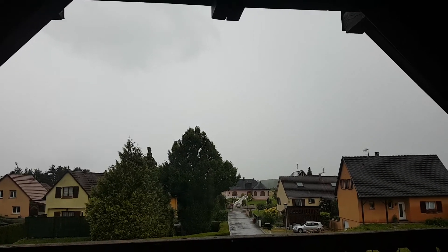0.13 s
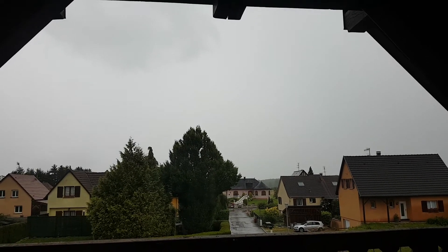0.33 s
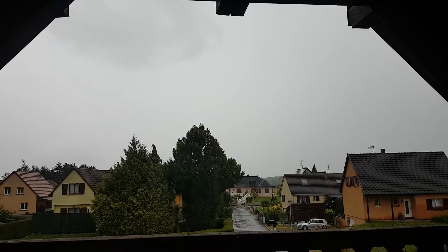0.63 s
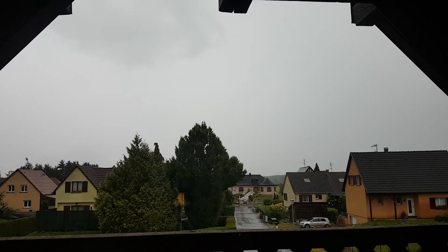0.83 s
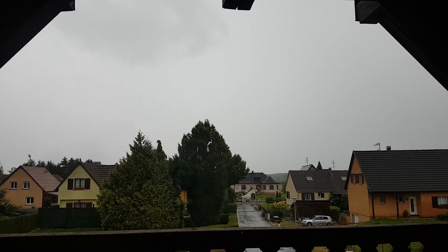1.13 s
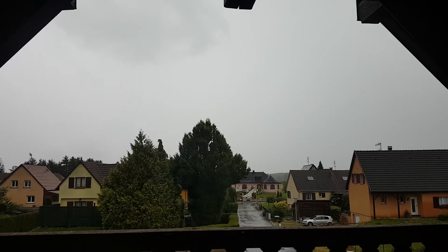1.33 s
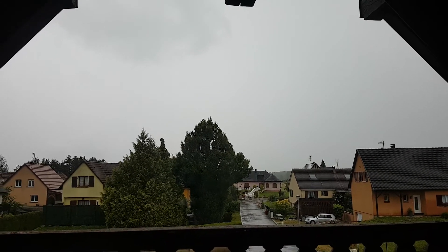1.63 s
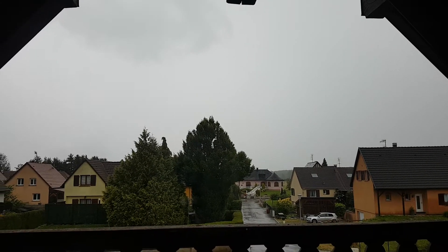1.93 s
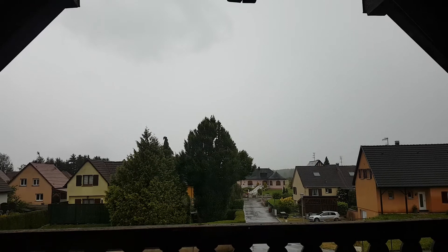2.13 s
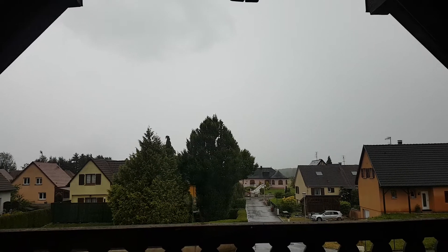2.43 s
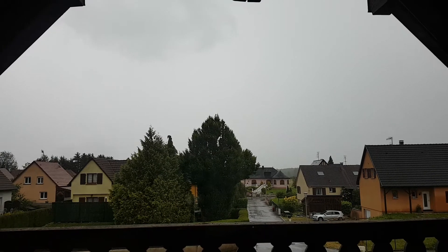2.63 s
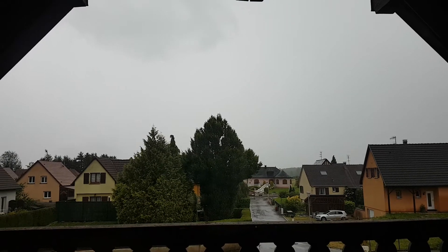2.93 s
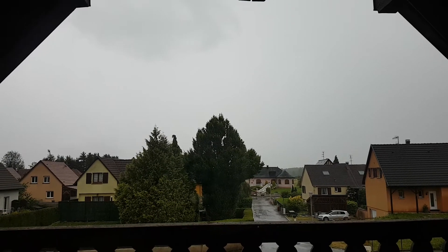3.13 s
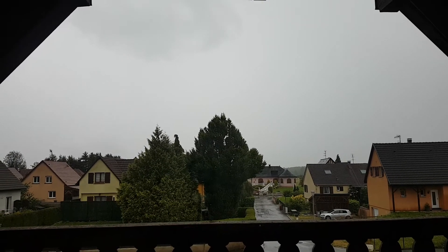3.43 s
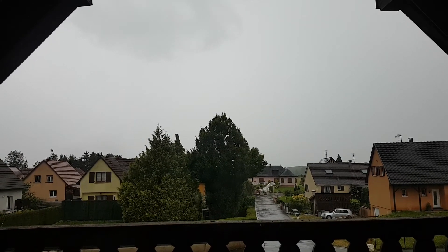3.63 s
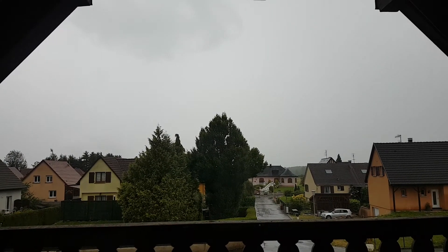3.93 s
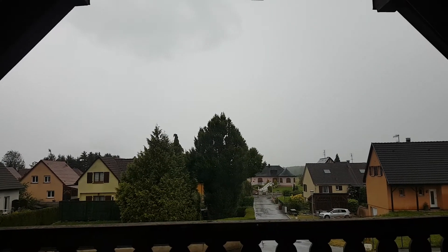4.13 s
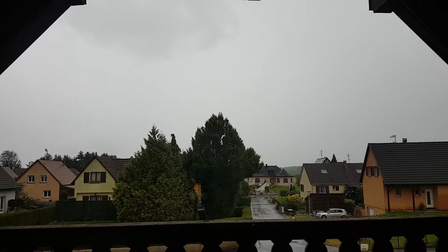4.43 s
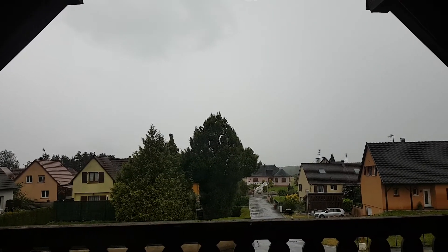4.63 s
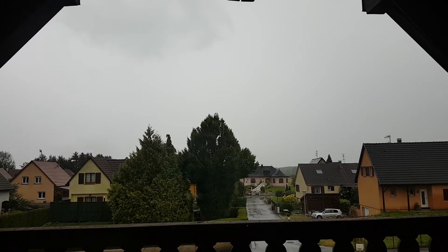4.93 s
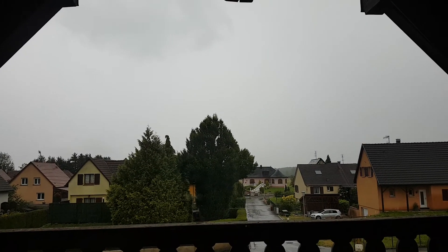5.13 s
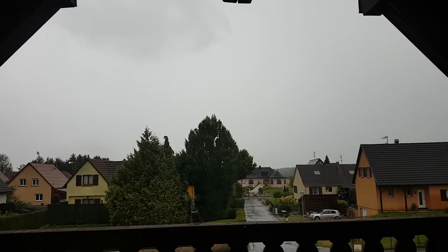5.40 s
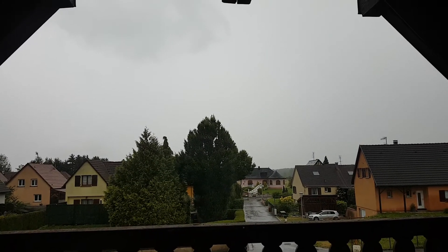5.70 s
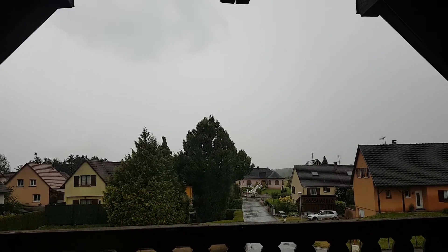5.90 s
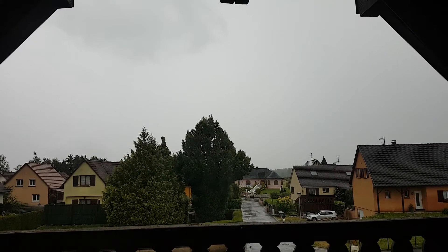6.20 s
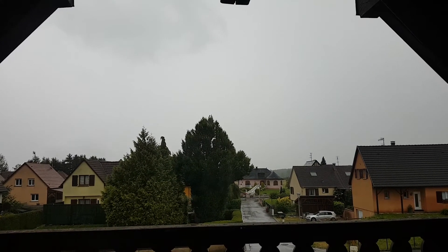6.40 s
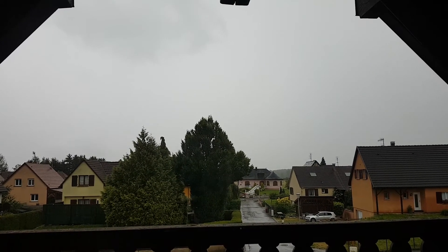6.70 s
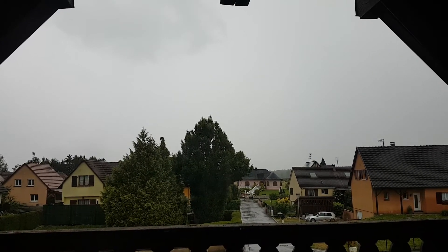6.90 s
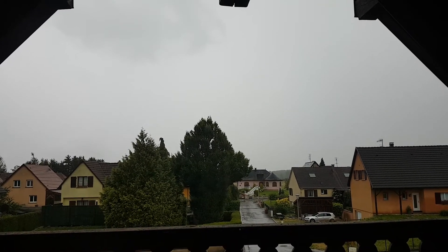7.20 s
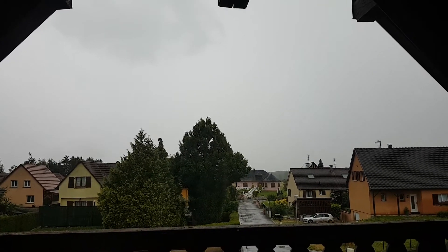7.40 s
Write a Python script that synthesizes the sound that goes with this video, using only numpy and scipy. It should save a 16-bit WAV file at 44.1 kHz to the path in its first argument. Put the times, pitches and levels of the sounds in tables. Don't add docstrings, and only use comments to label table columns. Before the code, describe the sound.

Near-silent drizzle, one ringing drop on the sill, then a violent rolling thunderclap crackles, booms repeatedly and dies into a low rumble.

```python
import sys
import numpy as np
from scipy import signal
from scipy.fft import rfft, irfft
from scipy.io import wavfile
from scipy.ndimage import uniform_filter1d

SR = 44100
rng = np.random.default_rng(int(sys.argv[2]) if len(sys.argv) > 2 else 0)


def invert_db(level):
    return 10 ** (np.asarray(level, dtype=float) / 20)


def output_pcm(signal):
    pcm = np.clip(np.atleast_2d(signal).T, -1, 1) * 32767
    wavfile.write(sys.argv[1], SR, np.round(pcm).astype(np.int16))


N = 332999

# frequency in Hz, level in dB per Hz.
RAIN_COLOUR = [(15, -26), (25, 0), (48, -13), (216, -12), (275, -20), (351, -12.5), (767, -20.5),
               (854, -14), (977, -14), (2080, -20.5), (2950, -24.5), (7180, -35), (9160, -42.5),
               (13400, -36.5), (15700, -35.5)]
# time in seconds, level in dB.
RAIN_SWELL = [(0, -62), (.8, -60.5), (1.599, -58), (3, -60.5), (4.999, -59), (6.499, -59), (7.55, -59.5)]
# start in seconds, peak in dB, treble in dB, ring in dB, ring pitch in Hz.
SILL_DROPS = [
    (.3374, -59, 19.5, -6, 4900),
    (.5274, -68, 7, -4, 4900),
    (1.0793, -29, -6.5, 14, 5020),
    (3.7667, -37, -4, 12, 3450),
]
# frequency in Hz, level in dB per Hz.
SILL_COLOUR = [(900, -41), (2200, -8.5), (3500, -6), (4000, -3), (4830, -8.5), (6000, -8.5), (7400, -12),
               (9200, -22.5), (11000, -7), (15000, -13)]
# frequency in Hz, likeness from 0 to 1.
ALIKE = [(30, .98), (120, .95), (450, .93), (560, .42), (850, .36), (1100, .52), (1500, .46), (2000, .3),
         (3500, .25), (6000, .03)]
# frequency in Hz, lead in radians.
LEAD = [(0, 0), (100, -.45), (500, -.55), (600, -.8), (750, -1.5), (950, -3), (1400, -3.2), (1800, -4.2),
        (2200, -6), (4000, -12)]
# frequency in Hz, left minus right in dB.
LEAN = [(60, 1), (130, -0.5), (290, -2.5), (640, -3), (1410, 0.5), (3100, -2), (6820, -2.5), (15000, -0.5)]
# frequency in Hz, level in dB per Hz.
AIR_COLOUR = [(12, -68), (20, -23), (53, 2.5), (113, -4.5), (146, -0.5), (260, -6), (400, -5), (702, -11),
              (1000, -14), (1400, -18.5), (2000, -31.5), (2500, -50.5), (3500, -62.5), (6000, -120)]
# frequency in Hz, width in
# Hz, gain in dB.
PEAKS_AND_DIPS = [(51, 9, -6), (62, 5.2, 5.5), (97, 41, 12), (152, 18, 4), (214, 7.4, 5.5), (256.7, 15, 5.5),
                  (293.8, 27, -9), (362.3, 14, 4.5), (463, 8, 5), (516, 11, 5.5), (639, 30, 2.5),
                  (857, 73, 2.5), (950, 490, 3), (1560, 120, 3.5)]
# time in seconds, strength in dB, depth in dB, nearness in dB.
ROLL = [(0.0, -85, -12.0, 3.5), (0.62, -75, -4, 1.5), (0.95, -65, 6, 5.5), (1.55, -47.5, -3.3, 5.5),
        (1.85, -61.5, 10.5, 3.5), (2.03, -57, 2.5, 4), (2.3, -30, -3, 2.8), (2.5, -35.5, 6.5, 3),
        (2.95, -37.5, -7, 1.55), (3.3, -27.5, 5, -0.7), (3.55, -44.5, 9, 1.5), (4.048, -49, 5.5, -2),
        (4.5, -41.5, 14.5, -2.2), (5.3, -32, 10.5, -2.8), (5.95, -42.5, -16, 0.5), (6.4, -44, 6.1, 1.5),
        (6.9, -52.5, 6.5, 4), (7.55, -55.5, 7.5, 3)]
PIECE_BORDERS = [110, 290, 850, 1800]
# level in dB, share of depth, share of nearness.
PIECES = [
    (-15.5, 1.45, 1.5),
    (-8, 1.15, 0.5),
    (-2.5, 0.042, -0.5),
    (-15.5, -0.22, 2.55),
    (-23, -.16, 3.5),
]
# peak time in seconds, peak in dB,
# fade in seconds per 10 dB, depth in dB.
SURGES = [(0.832, -53.5, 0.15, -4), (0.987, -46.5, 0.225, -7), (1.771, -39.5, 0.37, -9),
          (2.134, -24, 0.0782, 3.5), (2.259, -27, 0.12, -1), (2.374, -25.5, 0.067, 3.7),
          (2.558, -25, 0.04, 3.5), (2.802, -18.5, 0.0682, 8.5), (2.841, -20.6, 0.0176, 9.5),
          (2.901, -23.5, 0.0729, 4), (3.137, -23.5, 0.05, 9.5), (3.407, -38, 0.1047, 1.5),
          (3.774, -32.5, 0.26, -2), (4.204, -28.5, 0.03, 6.5), (4.269, -26.5, 0.172, 10),
          (5.49, -34.5, 0.13, 11.5), (5.807, -31.5, 0.0867, 11), (5.886, -33, 0.09, 9.5),
          (6.06, -32.5, 0.16, 8.5), (6.321, -38, 0.16, 7.5), (6.798, -46, 0.22, 9), (7.328, -49, -1.4, 5.5)]
# peak time in seconds, peak in dB,
# fade in seconds per 10 dB, depth in dB.
BURSTS = [(1.087, -54, 0.5, -9), (1.81, -35.5, 0.34, -10), (1.955, -37, 0.2, -5.5), (2.066, -23, 0.05, -5),
          (2.599, -18, 0.08, 7.5), (2.68, -31, 0.13, 5), (2.771, -23.5, 0.12, -15.5),
          (2.978, -27.5, 0.065, 8), (3.1, -28, 0.04, 8), (3.351, -24.5, 0.053, 7.5),
          (3.912, -30, 0.13, 5.5), (4.397, -28.5, 0.22, 4.5), (4.546, -32.5, 0.38, -0.8),
          (4.769, -26, 0.34, -1.8), (4.981, -32.5, 0.068, 14), (5.073, -31.5, 0.13, 11),
          (5.269, -35, 0.25, 12.5), (5.365, -28, 0.126, -18.5), (5.542, -28.5, 0.1175, 9),
          (5.641, -26.5, 0.0945, 10.5), (6.144, -31, 0.0474, 16.5), (6.43, -46, 0.28, -1.5),
          (6.7, -46, 0.12, 4.5)]
# start in seconds, peak in dB, ring pitch in Hz.
CLAPS = [(.812, -48.5, 451), (.9, -36, 393), (1.65, -35, 410), (1.753, -19, 413), (1.848, -20, 361),
         (1.946, -15.5, 472), (2.043, -13.5, 400), (2.068, -8, 451), (2.359, -11, 368), (2.547, -16, 326),
         (2.596, -6.5, 463), (2.674, -12.5, 219.5), (2.79, -8, 153), (2.839, -6.5, 216.6),
         (2.887, -12.5, 336), (3.102, -19.5, 141.6), (3.139, -10, 338), (3.282, -20.5, 313),
         (3.401, -18, 346), (4.18, -19.5, 149), (4.259, -7.5, 278), (4.755, -16, 353), (4.969, -21, 201),
         (5.065, -16.5, 140), (5.344, -18, 476), (5.466, -17, 131.4), (5.628, -11.5, 144.6),
         (5.662, -4.5, 251), (5.878, -25, 128.6), (6.141, -17, 152)]
# start in seconds, peak in dB, ring pitch in Hz.
BOOMS = [(1.08, -50.5, 70), (3.68, -37, 69.7), (4.74, -29.5, 70), (6.45, -43, 99.3), (7.001, -41.5, 100),
         (2.071, -35.5, 104), (2.594, -28.5, 90.4), (2.787, -22, 66.6), (2.869, -25, 71.2),
         (3.103, -23, 101.5), (3.913, -32, 91.6), (4.199, -27, 101.8), (5.041, -18.5, 66.2),
         (5.25, -18, 88.4), (6.031, -35.5, 57.8), (6.66, -38, 62), (6.759, -40, 62.6), (7.268, -45, 64.4)]
# start in seconds, peak in dB, centre in Hz,
# time to fade by 60 dB in seconds.
CRACKS = [(.72, -56, 1190, .4), (.82, -52, 1300, 0.35), (.926, -60.5, 2300, 0.044),
          (2.049, -55, 2600, 0.11), (2.0702, -58.5, 2800, 0.087), (2.124, -58.5, 2800, .12),
          (2.245, -64.5, 2600, .09), (2.5945, -43, 2180, 0.13), (2.5946, -58.5, 3240, 0.073),
          (.48, -57.5, 900, .1), (2.6197, -68, 3600, 0.053), (2.779, -54.5, 2200, 0.2),
          (2.3, -55, 2000, .2), (5.876, -61.5, 1990, .08), (5.659, -65, 2000, .09),
          (6.411, -65.5, 2700, .3), (6.495, -61, 2200, 0.33)]


def evened(x):
    return x / np.sqrt(np.mean(x ** 2) + 1e-20)


def read(points, hz):
    f, value = np.transpose(points)
    return np.interp(np.log(hz + 1), np.log(f + 1), value)


def causal(db):
    log_gain = np.log(invert_db(np.maximum(db - db.max(), -100)))
    full = np.r_[log_gain, log_gain[-2:0:-1]]
    phase = -signal.hilbert(full).imag
    h = np.fft.ifft(np.exp(full + 1j * phase)).real[:len(db)]
    return h / np.linalg.norm(h)


def uncoloured(taps):
    z = rfft(taps)
    size = abs(z) / np.sqrt(np.mean(abs(z) ** 2, -1, keepdims=True))
    return irfft(z / (size + .05) ** .7, taps.shape[-1])


def steadied(x, window_s):
    window = int(window_s * SR)
    power = uniform_filter1d(uniform_filter1d(x ** 2, window), window)
    return evened(x / (abs(power) + .05) ** .4)


def pair(a, b):
    hz = np.fft.rfftfreq(N, 1 / SR)
    alike = np.clip(read(ALIKE, hz), 0, 1)
    lag = np.exp(.5j * np.interp(hz, *np.transpose(LEAD)))
    turn = lag * invert_db(read(LEAN, hz) / 2)
    same = rfft(a) * np.sqrt((1 + alike) / 2)
    other = rfft(b) * np.sqrt((1 - alike) / 2)
    return np.array([irfft((same + other) * turn, N), irfft((same - other) / turn, N)])


def rain():
    z = rng.standard_normal((N // 256 + 5, 513, 5)).T
    noise = z[:2] + 1j * z[2:4]
    patches = evened(uniform_filter1d(uniform_filter1d(z[4], size=12, axis=0), size=12, axis=1))
    colour_db = read(RAIN_COLOUR, np.fft.rfftfreq(1024, 1 / SR))[:, None]
    wash = signal.istft(noise * invert_db(colour_db + 1.2 * patches), nperseg=1024, noverlap=768)[1]
    swell_db = np.interp(np.arange(N) / SR, *np.transpose(RAIN_SWELL))
    return evened(wash[:, :N]) * invert_db(swell_db)


def drops():
    echo_s, echo_db, knock_db, pan_db = 0.0062, -13.5, 16, -0.5
    hz, t, out = np.fft.rfftfreq(1024, 1 / SR), np.arange(SR // 8) / SR, np.zeros((2, N))
    high = np.clip(np.log2((hz + 1) / 6000), 0, 1)
    knock = knock_db / (1 + ((hz - 2600) / 350) ** 2)
    side_db = pan_db * np.array([[.5], [-.5]])
    for s, db, treble_db, ring_db, ring_hz in SILL_DROPS:
        splash = rng.standard_normal((2, len(t))) * invert_db(-6 - 60 * t / 0.012)
        reply = rng.standard_normal((2, len(t))) * invert_db(-19 - 60 * t / 0.17)
        splash[:, 0] += 2.5
        splash[:, :256] = uncoloured(splash[:, :256]) * invert_db(-60 * t[:256] / .03)
        reply[:, round(echo_s * SR):][:, :400] += invert_db(echo_db) * splash[:, :400]
        ring = ring_db / (1 + ((hz - ring_hz) / 500) ** 2)
        body_db = read(SILL_COLOUR, hz) + knock + ring
        tick = signal.fftconvolve(splash, causal(body_db + treble_db * high)[None], axes=1)
        tick += signal.fftconvolve(reply, causal(body_db - 12 * high)[None], axes=1)
        out[:, round(s * SR):][:, :tick.shape[1]] += invert_db(db + side_db) * tick / abs(tick).max()
    return out


def scatter(x, length_s, turns_per_s, count=6):
    t = np.arange(int(length_s * SR)) / SR
    signs = rng.choice([-1., 1.], (count, len(t)))
    hits = rng.random((count, len(t))) < .05
    taps = uncoloured(signs * hits * invert_db(-30 * t / length_s))
    taps /= np.linalg.norm(taps, axis=1, keepdims=True)
    place = turns_per_s * np.arange(N) / SR - np.arange(count)[:, None] + count / 2
    fed = x * np.cos(np.pi / 2 * np.clip(place % count - count / 2, -1, 1))
    return signal.oaconvolve(fed, taps, axes=1).sum(0)[:N]


def path_db(hz):
    rings = sum(db / (1 + (2 * (hz - f) / width) ** 2) for f, width, db in PEAKS_AND_DIPS)
    return read(AIR_COLOUR, hz) + rings


def cracks():
    hz, t, out = np.fft.rfftfreq(1024, 1 / SR), np.arange(SR // 5) / SR, np.zeros(N)
    for s, db, centre_hz, t60 in CRACKS:
        fade = invert_db(-60 * t / 0.0078) + invert_db(1 - 60 * t / t60)
        fizz = rng.standard_normal(len(t)) * fade
        fizz = signal.fftconvolve(fizz, causal(-38 * np.log2((hz + 1) / centre_hz) ** 2))
        out[round(s * SR):][:len(fizz)] += invert_db(db + 10.5) * fizz / abs(fizz).max()
    return out


def claps(events, t60_s, front_db):
    hz, t, out = np.fft.rfftfreq(8192, 1 / SR), np.arange(SR // 3) / SR, np.zeros(N + SR)
    front = causal(path_db(hz) + 7 * np.log2((hz + 1) / 500))
    front = invert_db(front_db) * front / abs(front).max()
    fade = invert_db(-60 * t / t60_s) * (1 - np.exp(-t / 0.00095))
    for s, db, ring_hz in events:
        cluster = rng.standard_normal(len(t)) * fade
        ring_db = -20 * np.log10(1 + ((hz - ring_hz) / (0.15 * ring_hz)) ** 2)
        body = signal.fftconvolve(cluster, causal(path_db(hz) + ring_db))
        body = body / abs(body).max()
        body[:len(front)] += front
        out[round(s * SR):][:len(body)] += invert_db(db - 6.0) * body
    return out[:N]


def strengths():
    surge_rise, burst_rise = 1.03, 5
    t = np.arange(0, N + 64, 64) / SR
    s, *columns = np.transpose(ROLL)
    roll_db, depth_db, near_db = [np.interp(t, s, c) for c in columns]
    peak_s, peak_db, fade_s, deep_db = np.transpose(SURGES + BURSTS)[:, :, None]
    rise = np.repeat([surge_rise, burst_rise], [len(SURGES), len(BURSTS)])[:, None]
    late = (t - peak_s) / np.maximum(fade_s, .02)
    surge_db = peak_db - 10 * np.maximum(late, -rise * late)
    for db, deep, near in PIECES:
        steady_power = invert_db(roll_db + deep * depth_db) ** 2
        surge_power = (invert_db(surge_db + deep * deep_db) ** 2).sum(0)
        gain = np.sqrt(steady_power + surge_power) * invert_db(db + near * near_db)
        yield np.interp(np.arange(N) / SR, t, gain)


def roll():
    shocks_per_s, spread_db = 4000, 2.5
    sizes = invert_db(spread_db * np.minimum(rng.exponential(1, N), 5)) * rng.choice([-1., 1.], N)
    shocks = evened(sizes * (rng.random(N) < shocks_per_s / SR))
    hz = np.fft.rfftfreq(16384, 1 / SR)
    borders = [1 / (1 + (hz / f) ** steep) for f, steep in zip(PIECE_BORDERS, (5, 9, 4, 5))]
    below = [0 * hz] + borders + [1 + 0 * hz]
    shares = np.maximum(np.diff(below, axis=0), 1e-8)
    windows_s = (0.018, 0.16, 0.027, 0.023, .03)
    out = np.zeros(N)
    for gain, share, window_s in zip(strengths(), shares, windows_s):
        piece = signal.oaconvolve(shocks, causal(path_db(hz) + 10 * np.log10(share)))[:N]
        out += gain * steadied(piece, window_s)
    return out


def scene():
    background = pair(*rain()) + drops()
    sharp_claps = claps(CLAPS, t60_s=0.16, front_db=-17)
    deep_booms = claps(BOOMS, t60_s=0.56, front_db=-24)
    thunder = roll() + sharp_claps + deep_booms + cracks()
    direct = thunder + invert_db(-8.5) * scatter(thunder, .2, 3.5)
    return background + pair(direct, scatter(thunder, 0.066, 9))


def top_cut(x):
    return signal.sosfilt(signal.butter(12, 16580, fs=SR, output="sos"), x)


def record(dry):
    ceiling, edge_hz = .75, 15760
    rounded = ceiling * np.tanh(dry / ceiling)
    limited = irfft(rfft(rounded) * (np.fft.rfftfreq(N, 1 / SR) < edge_hz), N)
    return top_cut(limited)


dry = scene()
out = record(dry)
output_pcm(out)
```